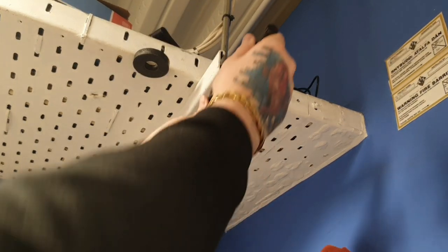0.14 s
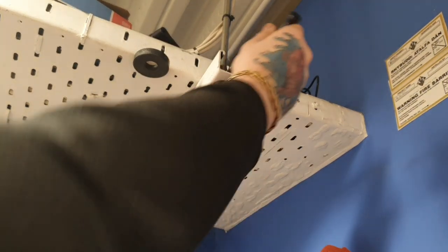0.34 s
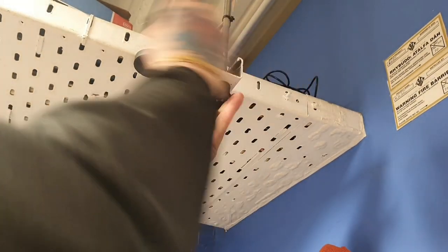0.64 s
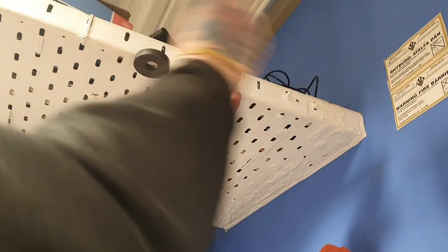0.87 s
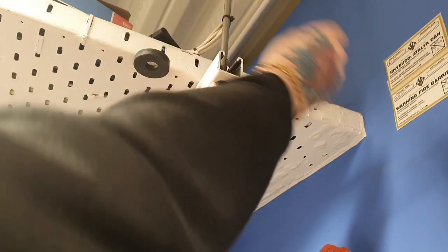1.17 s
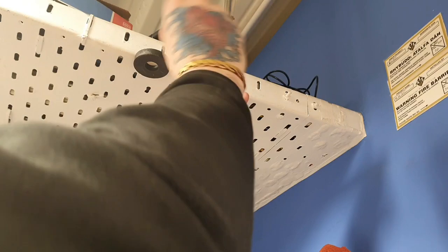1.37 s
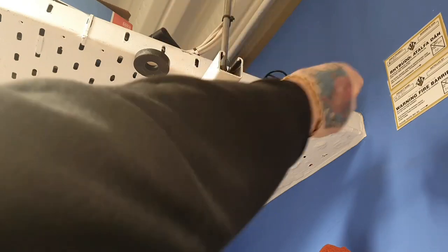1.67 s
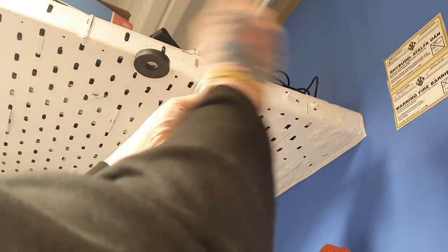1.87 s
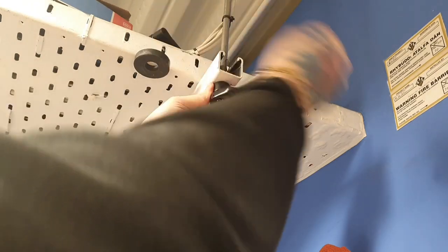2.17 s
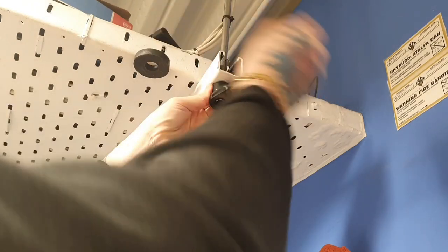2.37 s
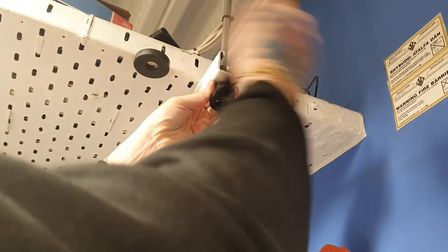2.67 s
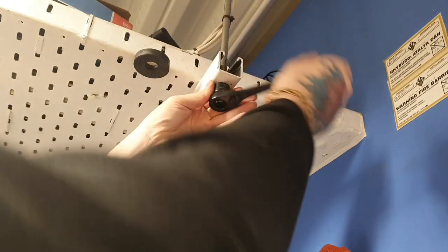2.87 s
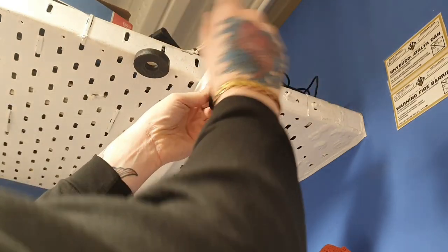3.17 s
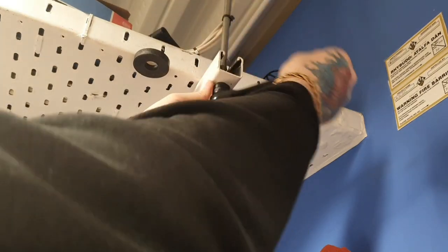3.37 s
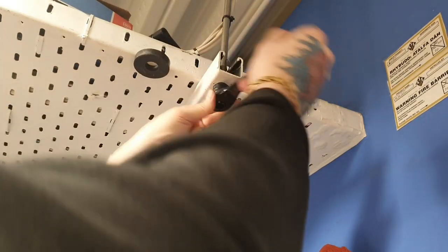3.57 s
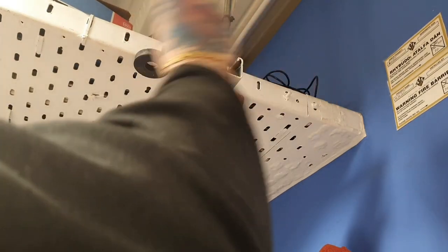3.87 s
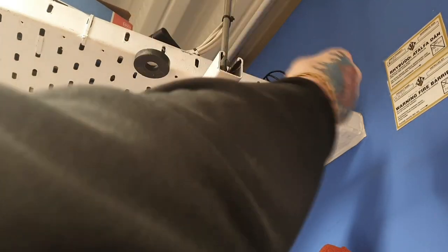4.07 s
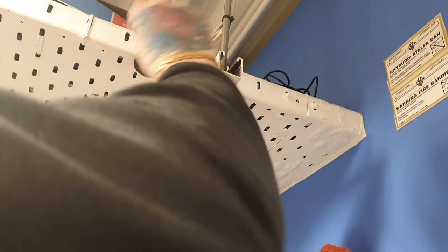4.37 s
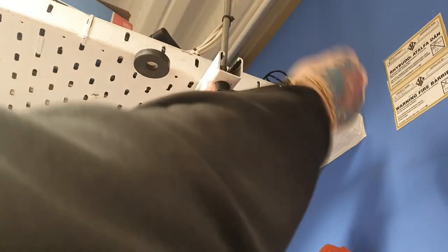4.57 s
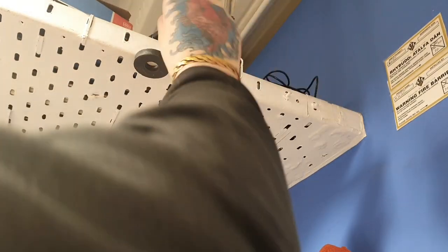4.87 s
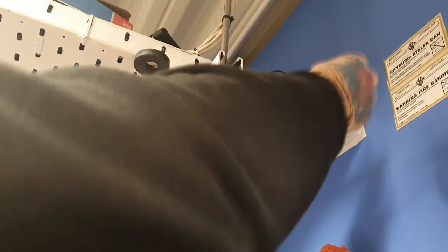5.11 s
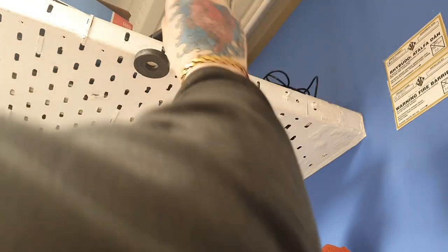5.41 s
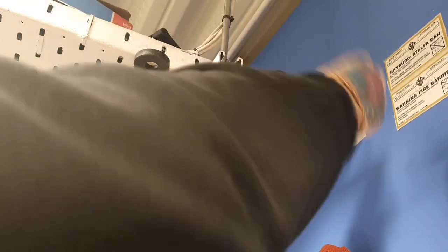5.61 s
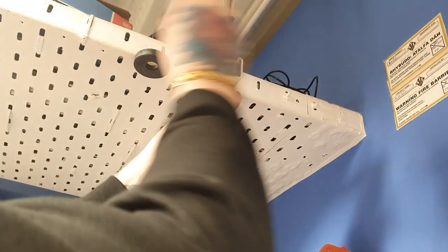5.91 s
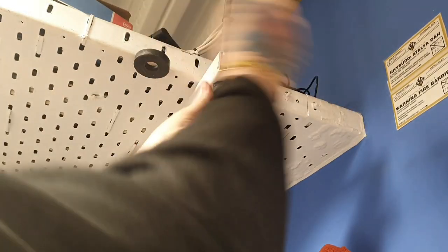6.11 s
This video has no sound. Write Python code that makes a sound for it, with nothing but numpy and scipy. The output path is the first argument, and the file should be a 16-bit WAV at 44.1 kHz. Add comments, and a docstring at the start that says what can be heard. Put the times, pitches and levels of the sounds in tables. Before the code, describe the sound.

A ratchet wrench turns a nut on a threaded rod carrying a perforated steel tray, close to the microphone in a small room. At first a sleeve rustles faintly and the socket clinks onto the nut, with the hardest knocks at about 0.4 seconds. A short burst of ratchet clicks comes at 1 second. Fuller bursts follow at about 1.6, 2.2, 2.8, 3.3, 4.0, 4.6, 5.1 and 5.6 seconds, with a last, very brief one at 6.2. Each is a bright, rapid run of metallic clicks lasting one to two tenths of a second, fastest in mid-swing. Between swings the socket taps lightly on the nut, with stronger knocks near 4.1 and 4.7 seconds. Clicks and knocks make the handle and tray ring briefly, with a short room echo. A faint fan hum and hiss continue throughout.

```python
"""A ratchet wrench runs a nut along the threaded rod that carries a perforated steel tray, near the
microphone in a small room. On each back-swing the pawl snaps over the teeth, faster in mid-swing;
between swings the socket knocks on the nut. Both ring the handle and shake the tray through the rod.
A sleeve rustles at the start, and a fan hums in the background."""
import sys
import numpy as np
from scipy import signal
from scipy.fft import rfft, irfft, next_fast_len
from scipy.io import wavfile

SR = 44100
rng = np.random.default_rng(int(sys.argv[2]) if len(sys.argv) > 2 else 0)


def dump_mix(stems):
    """Bounce the given channels to the path in sys.argv[1] as a 16-bit WAV at rate SR."""
    frames = np.atleast_2d(stems).T  # one column per channel
    limited = np.clip(frames, -1, 1)  # hard clip at full scale
    pcm = np.round(limited * 32767).astype(np.int16)
    wavfile.write(sys.argv[1], SR, pcm)


N = 275625

# rings of the handle, damped by the hand: (f/Hz, level/dB, t60/s)
HANDLE_MODES = [(3018, 2.5, 0.065), (3636, -2, 0.073), (4370, -7.5, 0.053), (4580, -2.5, 0.1),
                (4800, -5, 0.069), (5183, -10, .1), (5920, -7, .11), (6160, -5, .1), (6300, -9.5, .08),
                (7160, -7, .07), (10630, -1, 0.029), (14600, -3.5, .04)]
# rings of rod and tray: (f/Hz, level/dB, t60/s)
TRAY_MODES = [(288.3, -13.5, 0.36), (512.5, -12, 0.13), (550.6, -7.5, 0.13), (639, -2.5, 0.2),
              (767, -9, 0.13), (1021.5, 0, 0.12), (1064.6, -3.5, 0.13), (1258, -8.5, 0.31),
              (1373, -6, 0.045), (1414, 2.5, 0.14), (1810, -15.5, 0.095), (2094, -5, 0.077)]
# spectrum of a knock without its rings: (f/Hz, level/dB)
KNOCK_SPECTRUM = [(40, -44.5), (140, -12.5), (200, -16.5), (280, -10), (390, -16), (560, 1), (870, -6),
                  (1050, -1), (1900, -5), (3200, -3.5), (5000, -0.5), (7000, -4.5), (8500, -2), (15000, -9)]


def ratchet():
    """Each back-swing runs the pawl over the teeth; speed adds rebound and shakes the tray harder."""
    # One row per back-swing; grip and angle colour the clicks: (first click t/s, last click t/s, teeth,
    # entry and exit speed/share of top speed, fastest point/share of arc, level/dB, growth over arc/dB,
    # treble/dB, top-octave sparkle/dB, tray/dB, head ring f/Hz, its lift/dB, pawl ring f/Hz, rebound 0-1)
    swings = [(0.9699, 1.0417, 8, 0.91, 0.81, 0.57, -24, 2, -3.5, -1.5, 1.5, 4430, 4, 12170, 0.51),
              (1.6302, 1.7959, 16, 0.55, 0.3, 0.61, -24, -1.5, -2.5, 1, -1.5, 3970, 1.5, 15200, 0.5),
              (2.1971, 2.3787, 18, 0.71, 0.24, 0.46, -26, 0.5, -1.5, -0.5, -2, 3810, 5, 11300, 0.38),
              (2.7656, 2.947, 17, 0.71, 0.25, 0.34, -24.5, 0, -1, 3, -3, 4150, 2, 11300, 0.37),
              (3.3488, 3.4555, 11, 0.96, 0.57, 0.5, -25.5, 2, -0.5, 0, -3, 6750, 6, 11770, 0.34),
              (4.0028, 4.1807, 17, 0.56, .457, 0.59, -27.5, 0.5, 0.5, 0.5, 4, 6200, 5.5, 10230, 0.64),
              (4.555, 4.6821, 16, .507, .637, .836, -26, 0.5, -0.5, 0, 1, 4450, 4.5, 9270, 0.58),
              (5.115, 5.234, 15, 0.68, 0.43, 0.39, -25.5, -0.5, 0, -3, 0.5, 4870, 1, 9600, 0.53),
              (5.6304, 5.752, 16, 0.73, .408, 0.33, -27.5, 1, -0.1, -.5, 1.5, 6550, 6, 9560, 0.73),
              (6.207, 6.2457, 5, 0.8, 0.97, 1, -26, -2.5, -3, -3, 4.5, 4670, 4, 10300, 0.54)]
    brisk_gap_s = 0.014  # tooth to tooth in a brisk swing
    soft_start_db, soft_start_teeth, shake_growth_db = -4, 1.7, 6.5
    out = np.zeros(N)
    for (start, end, teeth, entry, leave, fastest, level_db, growth_db,
         treble_db, sparkle_db, tray_db, head_hz, lift_db, pawl_hz, rebound) in swings:
        times = tooth_times(start, end, entry, leave, fastest, count=round(teeth))
        speeds = np.clip(brisk_gap_s / np.abs(np.gradient(times)), .2, 1.5)
        clicks, shake = np.zeros((2, 3 * SR // 4))
        for k, (s, speed) in enumerate(zip(times - start, speeds)):
            arc = k / (len(times) - 1) - .5
            db = level_db + growth_db * arc + soft_start_db * np.exp(-k / soft_start_teeth)
            db += 1.03 * rng.standard_normal()  # no two teeth are alike
            bright_db = treble_db + 1.64 * rng.standard_normal()
            click = pawl_click(db, bright_db, sparkle_db, rebound * speed, head_hz, lift_db, pawl_hz)
            add(clicks, s, click)
            push = amp(db + tray_db + shake_growth_db * arc + 29) * speed
            add(shake, s + 0.002, push * chatter(t60=0.035, spike=0))  # spreads slowly through the steel
        sheet = coloured(shake, lambda hz: along(KNOCK_SPECTRUM, hz)
                         + along([(1800, -9.5), (5000, -20.5)], hz))
        add(out, start, clicks + amp(-22) * ring(clicks, HANDLE_MODES, vary_db=3.5))
        add(out, start, amp(-16.5) * room(sheet, near_db=-7.5, near_t60=0.049, tail_db=10))
        add(out, start, amp(-31.5) * ring(shake, TRAY_MODES, vary_db=2.5))
    return out


def tooth_times(first, last, entry, leave, fastest, count):
    """The hand swings like a pendulum, speeding up and slowing down over evenly spaced teeth."""
    arc = np.linspace(0, 1, count - 1)
    fastest = np.clip(fastest, .05, .95)
    away = (arc - fastest) / np.where(arc < fastest, fastest, 1 - fastest)
    end_speed = np.where(arc < fastest, entry, leave)
    speed = np.sqrt(1 - (1 - end_speed ** 2) * away ** 2 + 1e-6)
    elapsed = np.append(0, np.cumsum(1 / speed))
    return first + (last - first) * elapsed / elapsed[-1]


def pawl_click(db, treble_db, sparkle_db, rebound, head_hz, lift_db, pawl_hz):
    """The pawl snaps into a tooth and rebounds; its treble beams at the microphone, with less echo."""
    # spectrum of the steel pawl and wrench head: (f/Hz, level/dB)
    steel = [(100, -38), (500, -24.5), (1800, -13.5), (3000, -4.5), (4400, -1.5), (5500, -4.5), (6700, -3),
             (7800, -6.5), (9300, -9.5), (10800, -6.5), (13300, -12.5), (15200, -12)]
    snap = amp(db + 29.5) * swell(chatter(t60=.009, spike=.3), rise=.0002)
    add(snap, rng.uniform(.0015, 0.0045), rebound * snap)
    drift = 1 + 0.034 * rng.standard_normal(2)  # the rings wander as the head turns
    rings = lambda hz: (lift_db * bump(hz, head_hz * drift[0], width=0.081)
                        + 6 * bump(hz, pawl_hz * drift[1], width=0.04))
    hardness = [(6800, 0.0011), (8700, treble_db - sparkle_db),
                (11000, treble_db), (15000, treble_db + sparkle_db)]
    click = coloured(snap, lambda hz: along(steel, hz) + rings(hz) + along(hardness, hz))
    beam = lambda hz: along([(5000, 0), (10000, 1.5)], hz)
    direct, scattered = coloured(click, beam), coloured(click, lambda hz: -beam(hz))
    heard = room(scattered, near_db=-3.5, near_t60=0.078, tail_db=-6.6)
    add(heard, 0, direct - scattered)  # the straight path carries the brighter sound
    return heard


def socket():
    """The loose socket takes up its play against the nut: dull when eased, bright when it slams."""
    # socket on nut: (t/s, level/dB, contact hardness/dB, push into the tray/dB, chatter t60/s)
    knocks = [(0.166, -46, -2, -6, 0.088), (0.2508, -37.5, 2, -3.5, 0.02), (0.3149, -45, 11.5, -3, .032),
              (0.333, -41.5, 6, 0.5, .05), (0.3601, -30.5, 4.5, 2.5, 0.047), (0.4087, -25, 4.5, 3, 0.028),
              (0.7016, -52.5, 1.5, 5, 0.035), (1.2163, -47, 13.5, -3, 0.015), (1.283, -45, 4.5, 0, 0.028),
              (1.48, -49, -6.5, -0.5, 0.031), (1.89, -49.5, 1.5, 3.5, 0.02), (2.161, -53.5, 2, -4.5, .014),
              (2.458, -47.5, 1.5, -2.5, 0.03), (3.317, -48, -6, -3, 0.08), (3.623, -42.5, -1, 4.5, 0.017),
              (3.937, -45.5, -6.5, -2, 0.033), (3.965, -50.5, -3.5, 4, .088),
              (4.113, -30.5, 5.5, -0.5, 0.047), (4.183, -40.5, 8, 1, .019),
              (4.253, -38.5, -0.5, 2.5, 0.039), (4.489, -51, -4, 2.5, 0.035), (4.528, -44, -7, 3, 0.041),
              (4.65, -41.5, 6, -4.5, 0.062), (4.7475, -32.5, -5, -1, 0.022), (5.087, -50.5, -12, 2.5, .025),
              (5.292, -46.5, -6, 4.5, 0.019), (5.309, -43, 0.5, 0.5, 0.025),
              (5.5697, -38.5, -12, -1.5, 0.046), (5.599, -42, -3.5, 2.5, 0.13),
              (5.831, -45.5, -2.5, 2.5, 0.019), (6.1506, -40, -7.5, -0.5, 0.057)]
    out = np.zeros(N)
    for s, db, hard_db, push_db, t60 in knocks + fidgets(count=12):
        contact = swell(chatter(t60, spike=0.11), rise=0.078 * t60)  # long scrapes start softly
        add(contact, rng.uniform(0.0092, .03), amp(-18) * contact)  # the socket rocks back once
        force = np.pad(amp(db + 39) * contact, (0, SR // 3))
        edge_db = -14 + 1.68 * hard_db  # the top octave rises faster with hardness than the clank
        thump_db = push_db - 0.59 * max(db + 40, 0)  # the thump lags behind in strong knocks
        hardness = [(300, thump_db), (650, push_db), (1300, 0), (2700, 0.47 * hard_db - .5),
                    (3700, 0.71 * hard_db - 4.5), (7000, 1.39 * hard_db - 5.5),
                    (8300, edge_db - 6), (11000, edge_db - 2), (15000, edge_db - 10)]
        force = coloured(force, lambda hz: along(hardness, hz))
        knock = coloured(force, lambda hz: along(KNOCK_SPECTRUM, hz))
        add(out, s, room(knock, near_db=-4, near_t60=0.13, tail_db=-5.5))
        tray_db = -19 + 0.13 * (db + 41.5)  # hard blows ring the tray more
        add(out, s, amp(tray_db) * ring(force, TRAY_MODES, vary_db=1.5))
        add(out, s, amp(-21.5) * ring(force, HANDLE_MODES, vary_db=0.5))
    return out


def fidgets(count, level_db=-64, hard_db=1.5, push_db=0, t60=0.036):
    """The tool shifts in the hand: rows of faint knocks at random moments."""
    shares = (np.arange(count) + rng.random(count)) / count
    return [(share * N / SR, level_db, hard_db, push_db, t60) for share in shares]


def chatter(t60, spike):
    """One steel contact: a sharp first touch, then micro-impacts that die away."""
    t = np.arange(SR // 10) / SR
    burst = norm(rng.standard_normal(len(t)) * fade(t, t60))
    burst[0] += spike
    return norm(burst)


def ring(force, modes, vary_db, blur=0.016):
    """A force rings the modes; loose joints blur their phase, the contact point shifts their strength."""
    t = np.arange(SR // 3) / SR
    body = np.zeros(len(t))
    for hz, db, t60 in modes:
        phase = 2 * np.pi * (hz * t + rng.random())
        phase += blur * (hz / 1000) ** .5 * np.cumsum(rng.standard_normal(len(t)))
        body += amp(db + vary_db * rng.standard_normal()) * norm(np.sin(phase) * fade(t, t60))
    return signal.fftconvolve(force, body)[:len(force)]


def room(x, near_db, near_t60, tail_db):
    """Dense echoes off tray, wall and ceiling, then the room's tail; the moving arm renews them."""
    # reverberation of the small room: (f/Hz, t60/s)
    decay = [(150, 0.54), (600, 0.38), (1400, 0.23), (5000, 0.25), (8000, 0.22), (11000, 0.19),
             (16000, .13)]
    hz, frame_s, spectra = signal.stft(rng.standard_normal(SR // 3), SR, nperseg=256)
    tail = signal.istft(spectra * 1000.0 ** (-frame_s / along(decay, hz)[:, None]), SR, nperseg=256)[1]
    t = np.arange(len(tail)) / SR
    near = rng.standard_normal(len(t)) * fade(t, near_t60) * (t > .0012)
    paths = amp(near_db) * norm(near) + amp(tail_db) * swell(tail, rise=.006)
    paths[0] = 1  # the straight path to the microphone
    return signal.fftconvolve(x, paths)


def fan():
    """A fan in the background: rushing air and wavering tones."""
    # spectral density of the rush: (f/Hz, level/dB)
    air = [(20, -37.5), (33, -15), (50, -9), (70, 2), (140, -3), (215, -7), (310, 2.5), (500, -4.5),
           (720, 2.5), (920, -6.5), (1400, -1.5), (1800, -6), (2300, -2)]
    # tones of the fan: (f/Hz, rms level/dB)
    hum = [(318, -80.5), (684, -67.5), (730, -65.5), (770, -69.5), (850, -72.5), (1163, -75), (2277, -73)]
    rush = amp(-61) * noise(lambda hz: amp(along(air, hz)) / (1 + (hz / 2450) ** 30))
    tones = sum(amp(db) * noise(lambda hz: 1 / (1 + ((hz - centre) / 5) ** 2)) for centre, db in hum)
    return rush + tones


def hiss(sleeve_db=8, settle_s=.5):
    """Faint room hiss, raised at first by a sleeve that rustles as the tool is put on."""
    # spectral density of the hiss: (f/Hz, level/dB)
    spectrum = [(2000, -12), (2800, -3.5), (4800, 0.5), (6200, -6.5), (7600, -11.5), (10000, -13.5),
                (15500, -22)]
    level_db = sleeve_db * np.exp(-np.arange(N) / SR / settle_s) - 71
    return amp(level_db) * noise(lambda hz: amp(along(spectrum, hz)))


def amp(db):
    return 10 ** (np.asarray(db) / 20)


def norm(x):
    """x at energy 1."""
    return x / (np.linalg.norm(x) + 1e-12)


def along(points, hz):
    """Interpolate (f/Hz, value) points on a log frequency axis."""
    f, value = np.transpose(points)
    return np.interp(np.log(hz + 1), np.log(f), value)


def bump(hz, centre_hz, width):
    """A resonance of height 1; its width is a share of its frequency."""
    return 1 / (1 + ((hz / centre_hz - 1) / width) ** 2)


def fade(t, t60):
    """Gain that falls 60 dB in t60."""
    return np.exp(-np.log(1000) * t / t60)


def swell(x, rise):
    """x with a softened start (time constant rise/s), at energy 1."""
    return norm(x * (1 - np.exp(-np.arange(len(x)) / SR / rise)))


def add(track, s, sound):
    """Mix a sound into the track from time s."""
    part = track[max(round(s * SR), 0):][:len(sound)]
    part += sound[:len(part)]


def coloured(x, level_db, size=2048):
    """x through a minimum-phase filter with the given dB curve of frequency."""
    cepstrum = irfft(np.log(amp(level_db(np.fft.rfftfreq(size, 1 / SR)))))
    cepstrum[1:size // 2] *= 2
    cepstrum[size // 2 + 1:] = 0
    return signal.fftconvolve(x, irfft(np.exp(rfft(cepstrum))))[:len(x)]


def noise(gain):
    """Steady noise of rms 1 with the given gain curve of frequency."""
    x = irfft(rfft(rng.standard_normal(N)) * gain(np.fft.rfftfreq(N, 1 / SR)), N)
    return x / np.sqrt(np.mean(x ** 2) + 1e-20)


def scene():
    """Wrench and nut in front, fan and hiss behind, at one microphone."""
    return (ratchet() + socket() + fan() + hiss())[None]


def record(dry):
    """The microphone chain cuts off steeply at its band limit."""
    top_hz = 15850
    size = next_fast_len(N + SR // 2)
    hz = np.fft.rfftfreq(size, 1 / SR)
    return irfft(rfft(dry, size) / (1 + (hz / top_hz) ** 200), size)[:, :N]


dry = scene()
out = record(dry)
dump_mix(out)
```